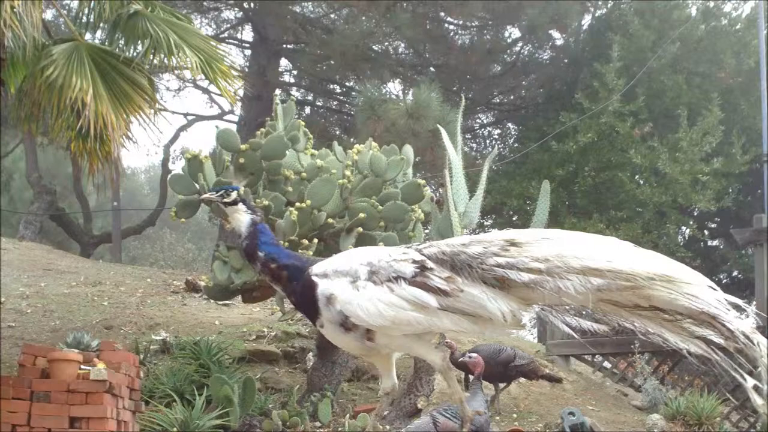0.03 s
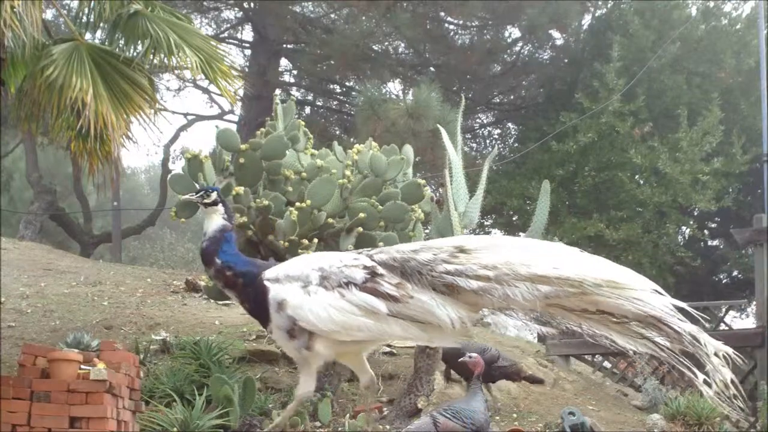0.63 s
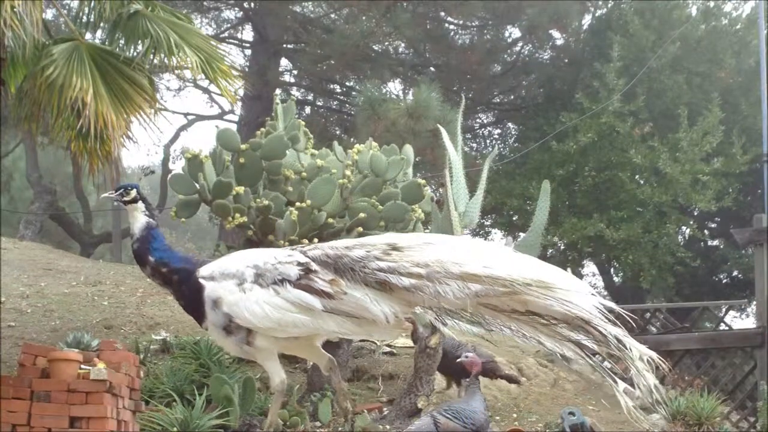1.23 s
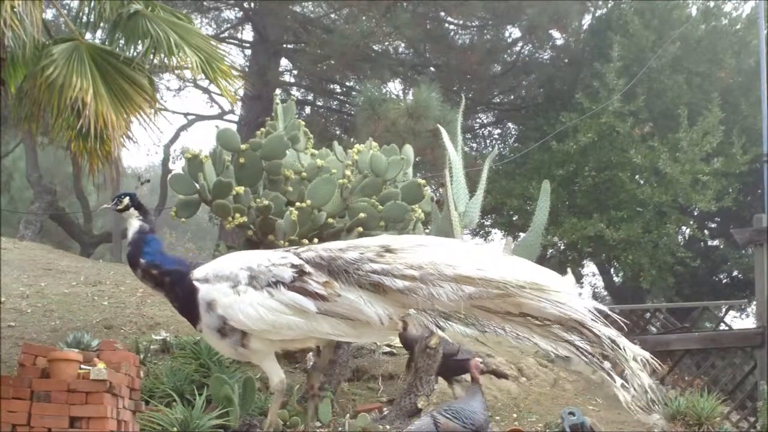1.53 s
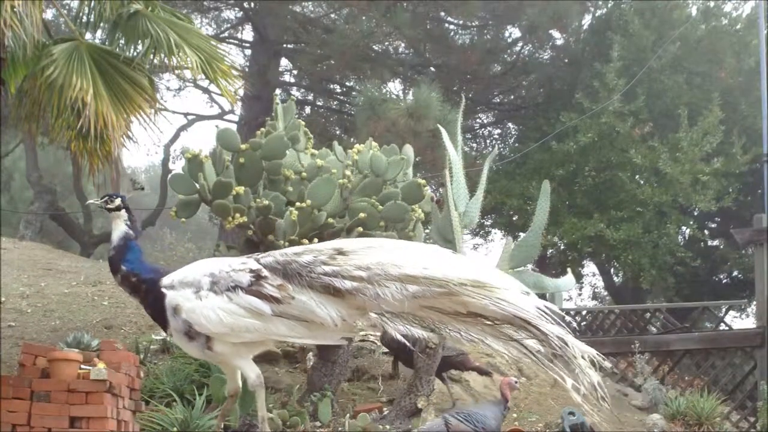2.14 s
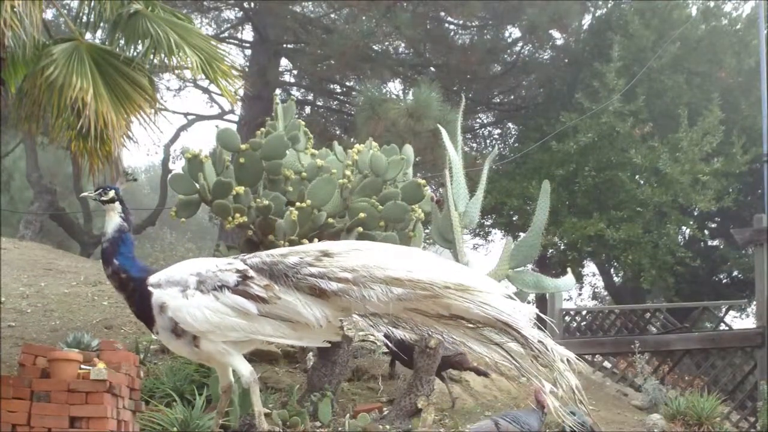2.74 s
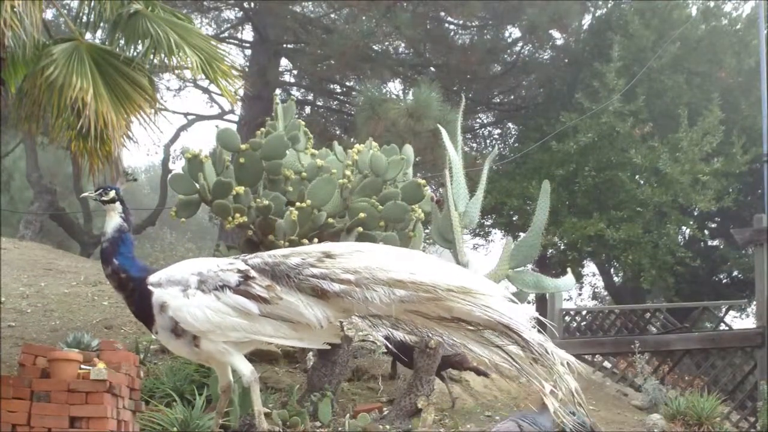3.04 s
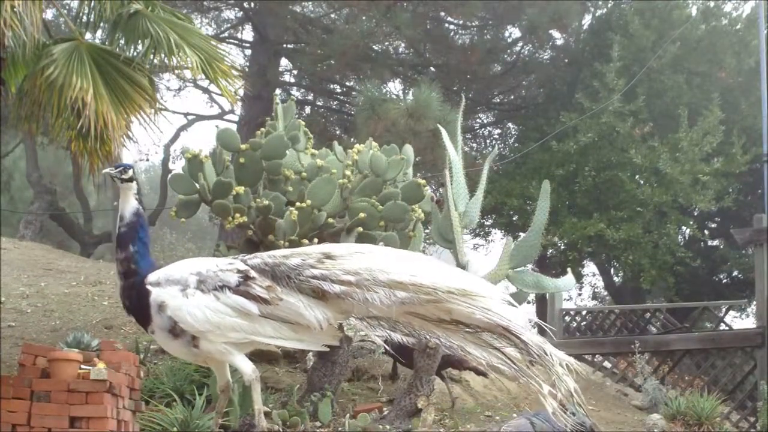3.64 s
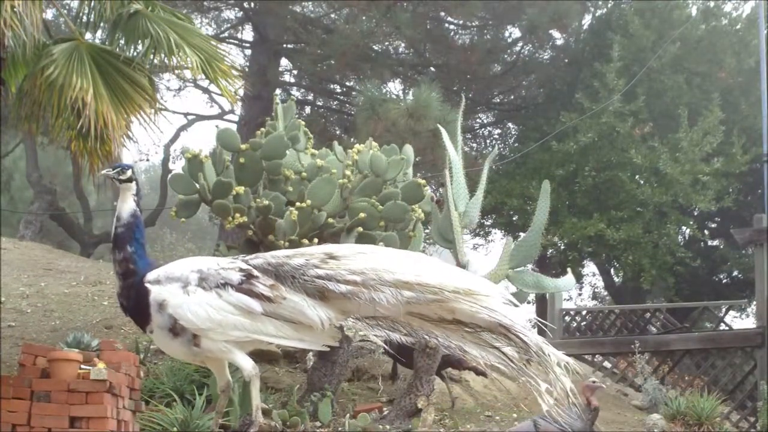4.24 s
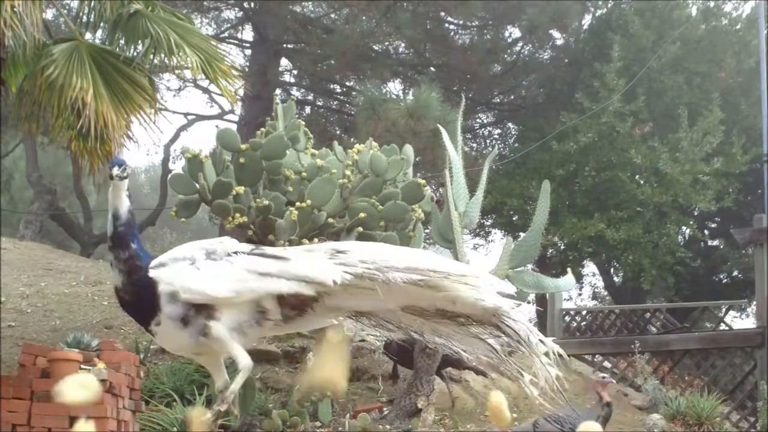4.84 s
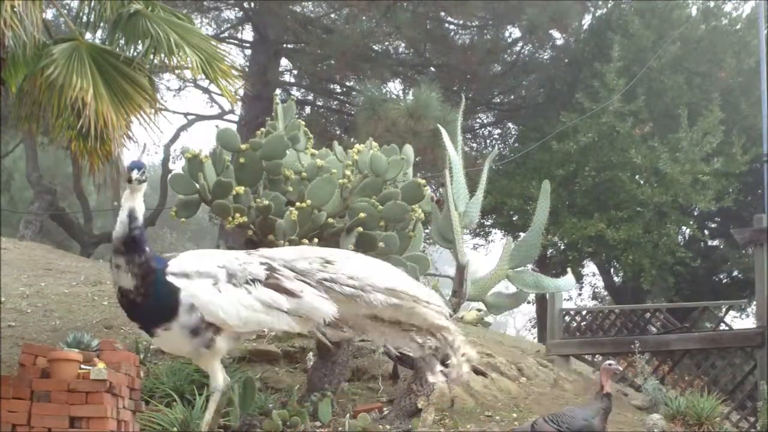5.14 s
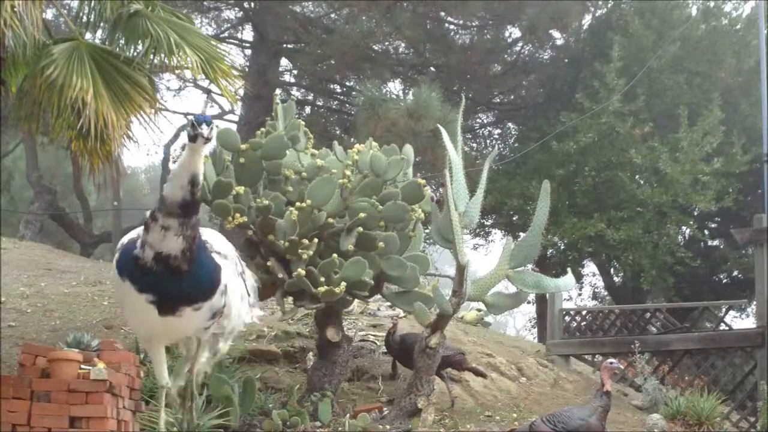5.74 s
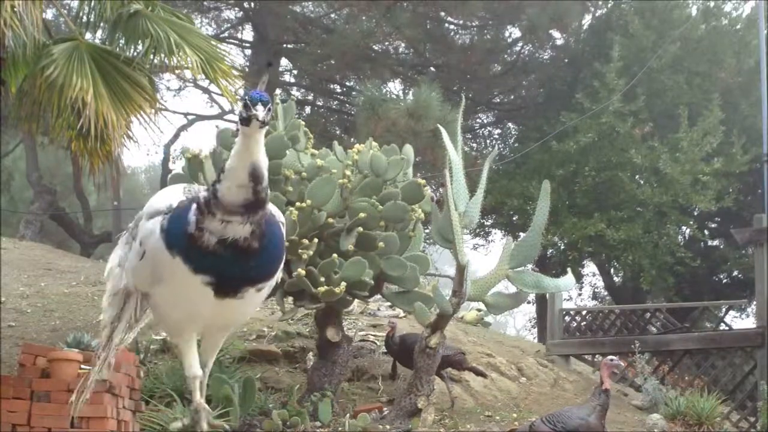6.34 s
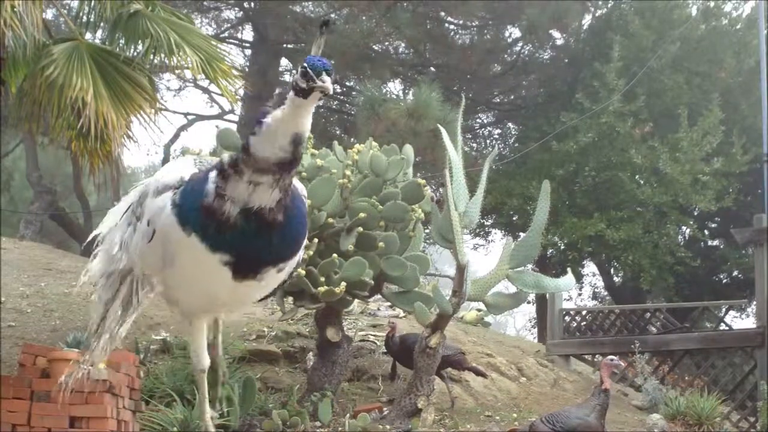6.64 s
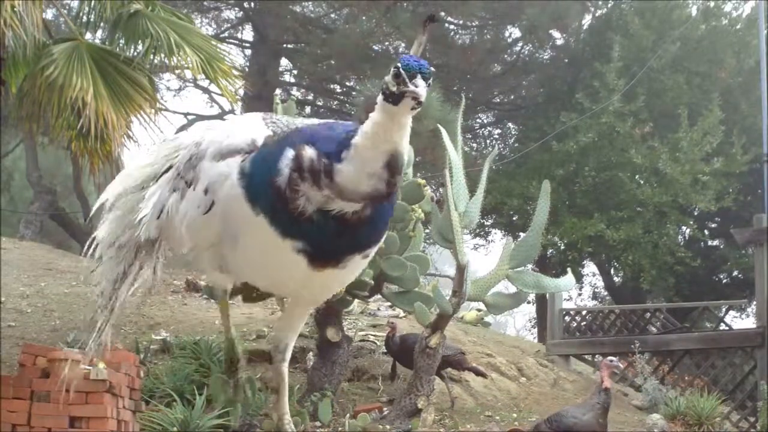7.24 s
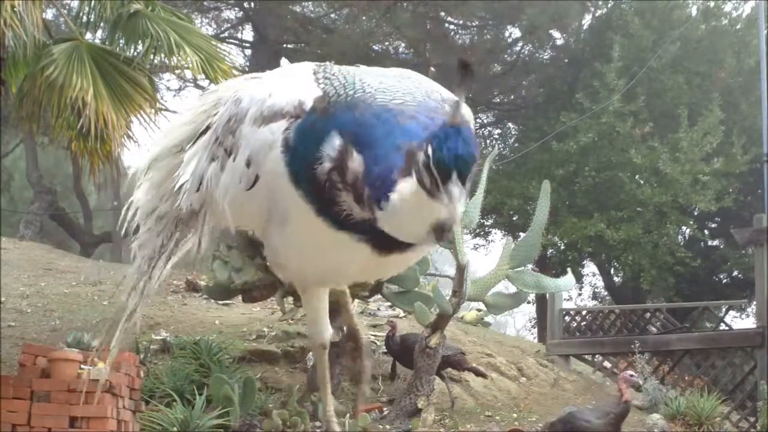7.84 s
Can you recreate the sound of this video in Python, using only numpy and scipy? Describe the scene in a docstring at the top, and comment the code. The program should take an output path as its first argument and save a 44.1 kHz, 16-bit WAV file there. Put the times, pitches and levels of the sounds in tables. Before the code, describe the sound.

Peanuts crunch in a tub close by, then two tossed handfuls hit wood sharply and clatter across a deck in a quiet garden.

```python
"""Peanut shells grate and crunch as a hand rummages in a tub close to a mono camera microphone.
The tub's air and walls, then the cupped palm, ring with them. Two tossed handfuls strike the near wood,
overload the microphone and scatter over a deck, whose boards ring. A peacock walks up the boards,
a small bird gives one thin whistle, and a low hum swells at the end over the air of a quiet garden."""
import sys
import numpy as np
from scipy import signal
from scipy.fft import rfft, irfft
from scipy.io import wavfile
from scipy.ndimage import uniform_filter1d

SR = 44100
rng = np.random.default_rng(int(sys.argv[2]) if len(sys.argv) > 2 else 0)


def wav_out(sig):
    """Save sig, one row per channel (or a flat mono array), as 16-bit PCM at SR to the path in sys.argv[1]."""
    wavfile.write(sys.argv[1], SR, np.round(np.clip(np.atleast_2d(sig).T, -1, 1) * 32767).astype(np.int16))


N = 348390
TIME = np.arange(N) / SR
BLOW_TIME = np.arange(8192) / SR  # time within one blow

# spectra of a nut on the deck and on the near wood (frequency [Hz], level [dB])
NUT_ON_DECK = [(150, -31), (280, -9), (450, -3), (800, -4), (1250, -3), (1700, -10), (2900, -1),
               (4200, -15.5), (5200, -15.5), (8500, -33), (12000, -47), (15000, -48)]
NUT_ON_NEAR_WOOD = [(40, -34), (120, -12.5), (300, -5), (600, 1.5), (1150, 0), (1900, -6), (2900, -1),
                    (4500, -9.5), (8500, -12.5), (12000, -25.5), (15000, -24)]


def amp(db):
    """Decibels to gain."""
    return 10 ** (np.asarray(db) / 20)


def unit(x):
    """Scales to rms 1."""
    return x / np.sqrt(np.mean(x ** 2) + 1e-20)


def curve(rows, t=TIME):
    """Reads (time, value) rows at times t."""
    return np.interp(t, *np.transpose(rows))


def ramp(start_s, length_s):
    """Rises from 0 to 1."""
    return np.clip((TIME - start_s) / length_s, 0, 1)


def swell(middle_s, half_length_s, level_db):
    """Gaussian rise and fall."""
    return amp(level_db) * np.exp(-np.minimum(((TIME - middle_s) / half_length_s) ** 2, 50))


def drift(top_hz):
    """Smooth random wander, rms 1."""
    rates_hz = top_hz * np.geomspace(0.1, 1, num=10)
    return unit(sum(np.sin(2 * np.pi * (hz * TIME + rng.random())) for hz in rates_hz))


def spectrum(colour, size):
    """Reads (frequency [Hz], level [dB]) rows on FFT bins."""
    hz, db = np.transpose(colour)
    return np.interp(np.log(np.fft.rfftfreq(size, 1 / SR) + 1), np.log(hz + 1), db)


def wash(colour):
    """Steady coloured noise."""
    return unit(irfft(rfft(rng.standard_normal(N)) * amp(spectrum(colour, N)), N))


def add(mix, start_s, sound):
    """Mixes a sound in."""
    part = mix[round(start_s * SR):][:len(sound)]
    part += sound[:len(part)]


def resonate(x, hz, width_hz):
    """Unity-gain resonance; hz may vary in time."""
    turn = np.exp(2j * np.pi * np.cumsum(hz * np.ones(len(x))) / SR)
    pole = np.exp(-np.pi * width_hz / SR)
    return 2 * (turn * signal.lfilter([1 - pole], [1, -pole], x / turn + 1e-18)).real


def impulses(per_s):
    """Sparse random impulses, one blow long."""
    return rng.standard_normal(len(BLOW_TIME)) * (rng.random(len(BLOW_TIME)) < per_s / SR)


def click(colour, ripple_db, size_spread=0.07, size=2048):
    """Minimum-phase click; each nut has its own size and random spectral ripple."""
    ripple = unit(signal.oaconvolve(rng.standard_normal(size // 2 + 1), np.hanning(28), "same"))
    pitch_ratio = np.exp(size_spread * rng.standard_normal())
    shape_db = spectrum(np.array(colour) * [pitch_ratio, 1], size) + ripple_db * ripple
    cepstrum = irfft(np.log(amp(np.maximum(shape_db, -80))))
    fold = 1 + np.sign(size // 2 - np.arange(size))
    fold[0] = 1
    return unit(irfft(np.exp(rfft(cepstrum * fold))))


def grains(colour, per_s, spread_db, ripple_db, kinds=16):
    """Many small contacts: mostly weak, a few strong, steady on average; rms 1."""
    hits = amp(spread_db * np.minimum(rng.exponential(1, N), 3.5)) * rng.choice([-1, 1], N)
    hits *= rng.random(N) < per_s / SR
    hits /= np.sqrt(abs(uniform_filter1d(hits ** 2, size=2600)) + 1e-6)
    kind = rng.integers(0, kinds, N)
    layers = (signal.oaconvolve(hits * (kind == k), click(colour, ripple_db))[:N] for k in range(kinds))
    return unit(sum(layers))


def balance(x, level_db, bass_db, mid_db, treble_db):
    """Sets the loudest short-term rms of three bands of a blow, each re level_db."""
    hz = np.fft.rfftfreq(len(x), 1 / SR)
    low = 1 / (1 + (hz / 800) ** 6)
    high = 1 - 1 / (1 + (hz / 4000) ** 8)
    bands = irfft(rfft(x) * np.array([low, 1 - low - high, high]))
    loudest = np.sqrt(uniform_filter1d(bands ** 2, size=300, axis=1, mode="constant").max(1))
    gains = amp(level_db + np.array([bass_db, mid_db, treble_db])) / loudest
    fade = np.minimum(1, np.linspace(10, 0, len(x)) ** 2)
    return gains @ bands * fade


def on_deck(x, ring_db):
    """Contacts ring the boards, differently at each spot."""
    board_modes = [(318.7, -10, 0.28), (382, -9.5, 0.16), (449.4, -3, 0.072), (648, 3.5, 0.025),
                   (809, 7, 0.018), (916, -17, 0.04), (1228, 9.5, 0.014), (2760, -2, 0.0091)]  # (frequency [Hz], level [dB], t60 [s])
    ring = 0
    for hz, db, t60_s in board_modes:
        db += 2 * rng.standard_normal()
        hz *= 1 + 0.03 * rng.standard_normal()
        ring += amp(db - 60 * BLOW_TIME / t60_s) * np.cos(2 * np.pi * hz * BLOW_TIME)
    return x + amp(ring_db) * signal.oaconvolve(x, ring)[:len(x)]


def blows(rows, colour, flurry_db, t60_s, ring_db, bass_db, mid_db):
    """Per row, a contact and a dying flurry ring the boards; bass lags as blows get harder."""
    bass_lag_db_per_db = 0.27
    out = np.zeros(N)
    for start_s, level_db, treble_db in rows:
        contact = click(colour, ripple_db=2.2)
        train = amp(flurry_db - 60 * BLOW_TIME / t60_s) * impulses(per_s=4500)
        train[0] = 1
        push = signal.oaconvolve(np.pad(train, (64, 0)), contact)[:len(BLOW_TIME)]
        lagged_bass_db = bass_db - bass_lag_db_per_db * level_db
        add(out, start_s, balance(on_deck(push, ring_db), level_db, lagged_bass_db, mid_db, treble_db))
    return out


def garden():
    """Steady air over a distant heaving rumble, fading in after a moment of silence."""
    # background spectra (frequency [Hz], level [dB])
    air_colour = [(15, -39), (25, -18), (59, -3), (119, -1), (246, -9.5), (598, -14.5), (722, -12.5),
                  (1240, -17), (1660, -25), (3260, -30), (4500, -34.5), (10900, -39), (11800, -48),
                  (13200, -39.5), (15500, -45)]
    rumble_colour = [(20, -21), (55, 9), (85, 5.5), (115, 14.5), (170, -7.5), (400, -48.5)]
    rumble_levels = [(0.3, -52), (0.55, -39), (2.5, -44.5), (4.3, -41.5), (7.9, -37.5)]  # (time [s], level [dB])
    air = wash(air_colour) * amp(-38 + 0.5 * drift(5))
    rumble = wash(rumble_colour) * amp(curve(rumble_levels) + 2 * drift(9))
    fade_in = ramp(0.1, 0.0075) * amp(-12 * (1 - ramp(0.1, 0.42) ** 2))
    return (air + rumble) * fade_in


def hum(start_s=4.55, swell_s=6.92, rise_s=0.38, idle_db=-40.5, full_db=-26.5):
    """Low wavering tones, as of a distant motor: they come in, idle, then swell."""
    partials = [(140, 2), (194, -14), (393, -34)]  # (frequency [Hz], relative level [dB])
    tones = 0
    for hz, db in partials:
        gain = amp(db + 1.14 * drift(9))
        wavering_hz = hz * (1 + 0.0034 * drift(4.1))
        tones += gain * np.sin(2 * np.pi * np.cumsum(wavering_hz) / SR)
    level = amp(idle_db) * ramp(start_s, rise_s) + (amp(full_db) - amp(idle_db)) * ramp(swell_s, rise_s)
    return unit(tones) * level


def small_bird(low_hz=7360, scoop_hz=1800, rasp_hz=108):
    """Raspy whistle, loudest at the bottom of its dip, with a weak upper voice; foliage scatters it."""
    progress = ramp(start_s=6.654, length_s=0.102)
    bend = (2 * progress ** 0.87 - 1) ** 2  # dips early
    waver = unit(uniform_filter1d(rng.standard_normal(N), size=30))
    phase = 2 * np.pi * np.cumsum(low_hz + scoop_hz * bend + rasp_hz * waver) / SR
    voices = np.sin(phase) + amp(-15) * np.sin(1.14 * phase) + amp(-26) * np.sin(2 * phase)
    call = voices * amp(-32.5 - 16 * bend) * np.minimum(1, 20 * progress * (1 - progress))
    leaves = rng.standard_normal(len(BLOW_TIME)) * amp(-60 * BLOW_TIME / 0.4)
    return call + amp(-10) * signal.oaconvolve(call, leaves / np.linalg.norm(leaves))[:N]


def handling():
    """Soft knocks through the camera body and one fingernail tick."""
    bumps = [(0.143, -22.5, -24), (2.275, -18, -36)]  # hand on camera (time [s], level [dB], relative treble [dB])
    bump_colour = [(40, -6), (130, -6), (280, -2.5), (500, -28), (2000, -41), (7000, -30), (15000, -46)]  # (frequency [Hz], level [dB])
    out = blows(bumps, bump_colour, flurry_db=-12, t60_s=0.03, ring_db=-66, bass_db=-10.5, mid_db=-22)
    tick = click(NUT_ON_NEAR_WOOD, ripple_db=2)
    add(out, 0.215, balance(tick, level_db=-21, bass_db=-40, mid_db=-12, treble_db=-15.5))
    return out


def peacock():
    """Padded feet, then toes, land on the boards; the long train swishes once."""
    steps = [(5.647, 0.034, -14.5, -28.5), (6.074, 0.043, -15.5, -40), (6.497, 0.034, -11, -39),
             (7.61, 0.044, -6, -61)]  # (time [s], toe delay [s], relative level [dB], relative treble [dB])
    # spectra of a foot and of feathers on the boards (frequency [Hz], level [dB])
    foot = [(100, 0), (250, -4), (420, 13), (720, -4), (1300, -17.5), (1800, -28.5), (3000, -21.5),
            (6000, -66), (15000, -54)]
    feathers = [(600, 10), (1200, -3), (1800, -3.5), (2900, -1), (4300, -12), (6000, -15.5), (10000, -22),
                (12000, -26), (15000, -24)]
    touches = [(s + delay_s, db, treble_db) for s, toe_s, db, treble_db in steps for delay_s in (0, toe_s)]
    toes = blows(touches, foot, flurry_db=-7, t60_s=0.065, ring_db=-39, bass_db=-11.5, mid_db=-12)
    swish = grains(feathers, per_s=6500, spread_db=5.5, ripple_db=5)
    return amp(-2.5) * toes + swish * swell(middle_s=7.555, half_length_s=0.087, level_db=-33)


def scatter(landing_s=0.3, rise_db=8):
    """Patter builds as each handful lands and fades as the nuts come to rest."""
    handfuls = [(4.72, -20.5, 38), (6.82, -31.5, 22)]  # (first impact [s], relative level [dB], decay [dB/s])
    level = 0
    for start_s, db, decay_db_per_s in handfuls:
        build_db = rise_db * (ramp(start_s, landing_s) - 1.5)
        decay_db = decay_db_per_s * np.maximum(TIME - start_s - landing_s, 0)
        level += (TIME > start_s) * amp(db + build_db - decay_db)
    patter = grains(NUT_ON_DECK, per_s=300, spread_db=5, ripple_db=2.5)
    return level * unit(on_deck(patter, ring_db=-10))


def toss():
    """Nuts hit the near wood hard and dry, then bounce over the deck."""
    # near hits and loudest bounces (time [s], relative level [dB], relative treble [dB])
    strikes = [(4.706, 8.5, -15.5), (4.711, 2, -32), (4.724, 11.5, -23), (4.74, 8, -22.5),
               (4.75, -2.5, -23), (6.802, 13.5, -17), (6.813, 1, -4.5), (6.821, 6, -31), (6.828, 4, -12.5)]
    bounces = [(4.796, -8, -33), (4.86, -8.5, -35), (4.887, -2.5, -24), (4.897, 2, -21), (4.909, -3.5, -19),
               (4.93, -2, -45), (4.951, -3.5, -24), (4.99, -7, -36), (5.022, -14.5, -27),
               (5.048, -8, -21.5), (5.071, -6.5, -36), (5.095, 1, -35), (5.126, -6.5, -31),
               (5.163, -12, -24.5), (5.196, -8, -48), (5.22, -11.5, -34), (5.272, -8.5, -22.5),
               (5.347, -12, -56), (5.39, -15.5, -56), (5.512, -23, -47), (5.735, -17, -22),
               (6.908, -7, -29), (6.943, -5, -18.5), (6.948, -4, -19.5), (7.025, -20, -46),
               (7.04, -14, -45), (7.055, 2, -27.5), (7.081, -9, -23.5), (7.146, -2.5, -40),
               (7.171, -9.5, -32), (7.235, -5, -35), (7.27, -13, -28), (7.349, -18, -25), (7.372, -17, -27),
               (7.756, -17, -18.5), (7.786, -21.5, -27)]
    near = blows(strikes, NUT_ON_NEAR_WOOD, flurry_db=-13, t60_s=0.028,
                 ring_db=-44.5, bass_db=-13.5, mid_db=-9.5)
    far = blows(bounces, NUT_ON_DECK, flurry_db=-11.5, t60_s=0.033,
                ring_db=-36.5, bass_db=-16.5, mid_db=-12)
    return amp(-3.5) * near + amp(-1.5) * far + scatter()


def in_tub(x, t):
    """The tub's walls and air ring; the air resonance rises as the hand comes up."""
    air_resonance = [(0.42, 415), (0.54, 506), (1.1, 440), (1.3, 572), (2.05, 610), (2.3, 750)]  # (time [s], frequency [Hz])
    wall_modes = [(830, 180, 2), (1293, 99, 0.5)]  # (frequency [Hz], width [Hz], gain [dB])
    walls = sum(amp(db) * resonate(x, hz, width_hz) for hz, width_hz, db in wall_modes)
    return x + walls + amp(5) * resonate(x, curve(air_resonance, t), width_hz=55)


def in_palm(x, t):
    """The cupped hand rings higher, the same at all times t."""
    palm_modes = [(1250, 200, -1), (2010, 240, 2), (2750, 160, -5)]  # (frequency [Hz], width [Hz], gain [dB])
    return x + sum(amp(db) * resonate(x, hz, width_hz) for hz, width_hz, db in palm_modes)


def in_open(x, t):
    """Open air: nothing rings."""
    return x


def effort(attack_s=0.03, release_db_per_s=197):
    """Stirring strength: the heap yields quickly to each stroke, then settles."""
    strokes = [(0.424, 0.21, -21.5), (0.799, 0.14, -24), (0.998, 0.11, -24), (1.39, 0.074, -37.5),
               (1.498, 0.033, -13.5), (1.657, 0.12, -24), (2.281, 0.032, -26.5), (2.566, 0.063, -17),
               (2.704, 0.017, -22), (3.055, 0.15, -37.5), (3.18, 0.069, -24), (3.531, 0.2, -39.5)]  # (start [s], length [s], level [dB])
    envelopes = []
    for start_s, length_s, db in strokes:
        release_db = release_db_per_s * np.clip(TIME - start_s - length_s, 0, 1)
        envelopes.append(ramp(start_s - attack_s / 2, attack_s) * amp(db - release_db))
    return np.max(envelopes, axis=0)


def crunches(start_s, end_s, colour, cavity, fall_t60_s=0.051):
    """The heap slips: contacts swell to one hard knock and die away; big slips build for longer."""
    # (time [s], relative level [dB], relative bass [dB], relative treble [dB])
    slips = [(0.379, -29.5, 10, -15), (0.417, -2.5, -0.5, -17.5), (0.468, -2.5, -4.5, -22),
             (0.486, -7, -14, -25), (0.534, -1, -7, -26), (0.585, 1, -7.5, -19), (0.649, 1, -9, -27.5),
             (0.734, -19, 6, -19.5), (0.781, -8, 0, -21), (0.81, -3.5, -17, -27.5), (0.896, -12.5, 3, -24),
             (0.921, -5, -14, -23), (1.085, 4.5, -34, -20), (1.384, -25.5, 6, -45), (1.402, -19, -2, -45),
             (1.496, -4, -7.5, -46), (1.518, 6, -11.5, -32), (1.686, -2.5, -14.5, -35),
             (1.718, -5, -28, -28.5), (1.773, -8, -20, -34), (2.007, -23.5, -1.5, -34),
             (2.273, -11.5, -13, -20.5), (2.299, -23, 1, -24), (2.334, 2.5, -15, -33.5),
             (2.386, -23.5, -3, -14.5), (2.556, -17, -10, -40), (2.584, 6.5, -25, -40),
             (2.626, -6.5, -14.5, -21), (2.655, -5, -19, -21.5), (2.73, -7, -13, -25),
             (2.937, -12.5, -11.5, -26), (3.204, -5.5, -20, -32), (3.295, -11.5, -32, -32),
             (3.558, -8, -23, -19), (3.612, -21.5, -13, -17), (3.857, -19.5, -39, -28),
             (4.025, -10.5, -45, -27), (4.418, -27, -11, -18)]
    knock = len(BLOW_TIME) // 6
    lead_s = BLOW_TIME[knock]
    t = BLOW_TIME - lead_s
    out = np.zeros(N)
    for slip_s, level_db, bass_db, treble_db in slips:
        if start_s <= slip_s < end_s:
            rise_t60_s = 0.007 + 0.033 * amp(min(level_db, 0))
            train = amp(-11.5 - 60 * np.maximum(t / fall_t60_s, -t / rise_t60_s)) * impulses(per_s=3300)
            train[knock] = 1
            shells = signal.oaconvolve(train, click(colour, ripple_db=2.2))[:len(t)]
            ringing = cavity(shells, slip_s + BLOW_TIME)
            crunch = balance(ringing, level_db, bass_db, mid_db=-9.5, treble_db=treble_db)
            add(out, slip_s - lead_s + 0.002, amp(-3) * crunch)
    return out


def rummage(dig_s=0.37, scoop_s=1.28, lift_s=2.32, hold_s=3.46, throw_s=4.7):
    """Shells grate and husks hiss as the hand digs, scoops, lifts and holds."""
    # spectra: shells deep in the tub, along its wall, in hand, in the open (frequency [Hz], level [dB])
    deep = [(88, -67), (150, -27.5), (268, -21), (481, -0.5), (656, -15), (1220, -6.5), (1540, -27),
            (1830, -14.5), (2270, -26), (2920, -6), (3350, -15), (4140, -48), (5130, -32), (15500, -74)]
    scooped = [(120, -71), (200, -27), (378, -22.5), (437, 0.5), (607, -3.5), (992, -9), (1980, -8.5),
               (2510, -15), (3420, -12), (4500, -71), (5010, -24), (6960, -37), (15500, -50)]
    lifted = [(120, -61), (200, -33), (454, -10.5), (641, -2), (1260, 3), (1650, -7), (2020, 2.5),
              (2420, -17.5), (2900, -2), (3750, -15.5), (4100, -28), (6020, -17), (6710, -31), (15500, -46)]
    loose = [(400, -26), (850, 3.5), (1900, 1.5), (3000, 5), (4400, -15.5), (6200, -1.5), (8500, -30),
             (15000, -29)]
    husk_colour = [(3000, -13), (5500, 18), (7500, 5.5), (10000, 9.5), (12000, -16), (14500, 15),
                   (15800, -33)]  # (frequency [Hz], level [dB])
    husk_rubs = [(1.173, 0.043, -47), (1.522, 0.016, -37), (1.862, 0.17, -56.5), (2.878, 0.015, -43),
                 (2.951, 0.0082, -42.5), (3.062, 0.0089, -38.5)]  # husk over skin (middle [s], half length [s], level [dB])
    shifting = [(1775, -58), (1700, -48), (1693, -44), (587, -56.5)]  # per stage (stroke contact rate [1/s], level between strokes [dB])
    stages = [(dig_s, scoop_s, deep, in_tub), (scoop_s, lift_s, scooped, in_tub),
              (lift_s, hold_s, lifted, in_palm), (hold_s, throw_s, loose, in_open)]
    stir = effort() * amp(2.5 * drift(60))  # shells catch and slip
    husk_level = amp(-30.5) * stir + sum(swell(*rub) for rub in husk_rubs)
    out = grains(husk_colour, per_s=1300, spread_db=5.8, ripple_db=2) * husk_level
    for (start_s, end_s, colour, cavity), (per_s, rest_db) in zip(stages, shifting):
        shells = grains(colour, per_s, spread_db=5.2, ripple_db=3.2)
        grating = unit(cavity(shells, TIME)) * stir
        idle = grains(colour, per_s=450, spread_db=6, ripple_db=4, kinds=6)
        idle *= amp(rest_db + 2.5 * drift(16))  # shells shift in fits
        out += (grating + idle) * (TIME >= start_s) * (TIME < end_s)
        out += crunches(start_s, end_s, colour, cavity)
    return out


def porch(x, wet_db=-21, t60_s=0.089):
    """Faint, short reflections from wall and railing."""
    echoes = impulses(per_s=2000) * amp(-60 * BLOW_TIME / t60_s) * (BLOW_TIME > 0.006)
    tail = signal.lfilter([1], [1, -0.5], echoes)
    return x + amp(wet_db) * signal.oaconvolve(x, tail / np.linalg.norm(tail))[:N]


def scene():
    """One microphone on both channels."""
    mono = porch(rummage() + toss() + peacock()) + handling() + small_bird() + hum() + garden()
    return np.array([mono, mono])


def record(dry, threshold_db=-11, recover_db_per_s=22, squeeze=0.49, lag_s=0.032, edge_hz=15750):
    """Slow gain control ducks what follows the hardest blows, which clip; then the band limit."""
    power_db = 10 * np.log10(abs(uniform_filter1d(dry[0] ** 2, size=900)) + 1e-12)
    recovery_db = recover_db_per_s * TIME
    held_db = np.maximum.accumulate(power_db + recovery_db) - recovery_db
    over_db = np.maximum(held_db - threshold_db, 0)
    pole = np.exp(-1 / (lag_s * SR))
    ducked = dry / amp(squeeze * signal.lfilter([1 - pole], [1, -pole], over_db))
    clipped = ducked / (1 + ducked ** 12) ** (1 / 12)
    lowpass = signal.firwin(255, edge_hz, window=("kaiser", 8), fs=SR)
    return signal.oaconvolve(clipped, lowpass[None], "same")


dry = scene()
out = record(dry)
wav_out(out)
```